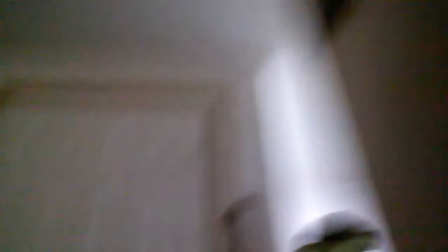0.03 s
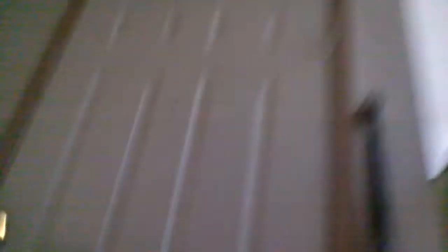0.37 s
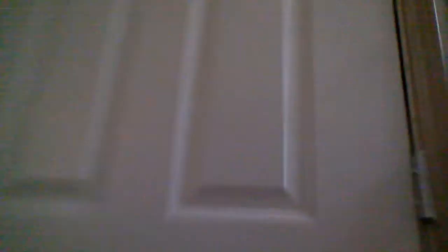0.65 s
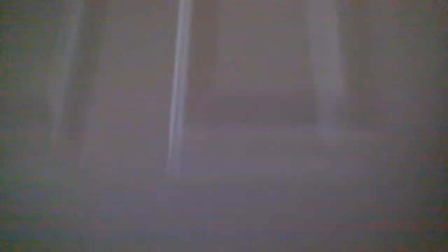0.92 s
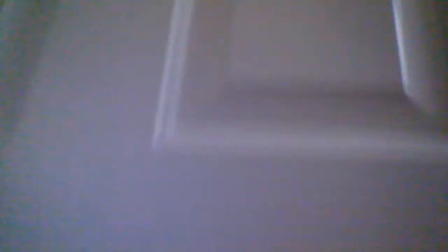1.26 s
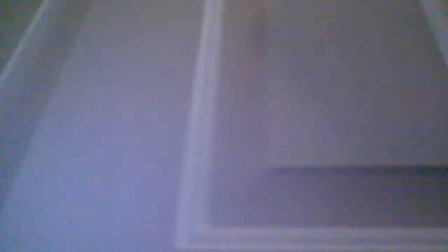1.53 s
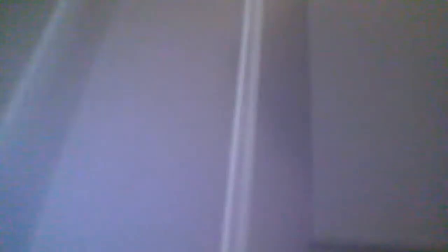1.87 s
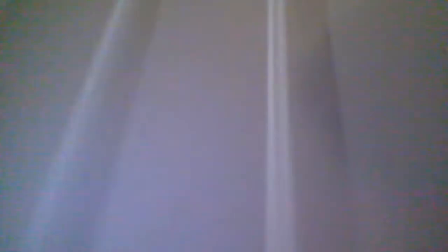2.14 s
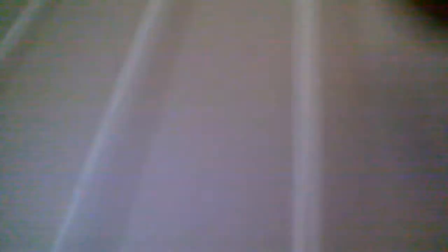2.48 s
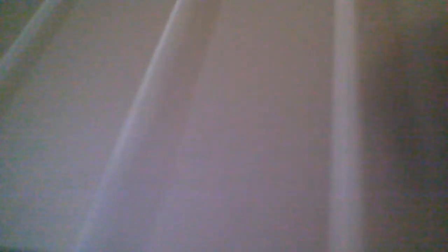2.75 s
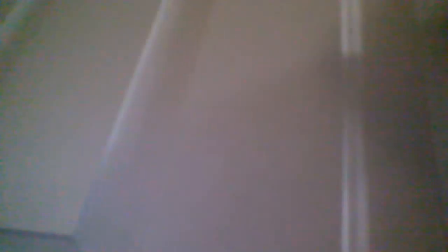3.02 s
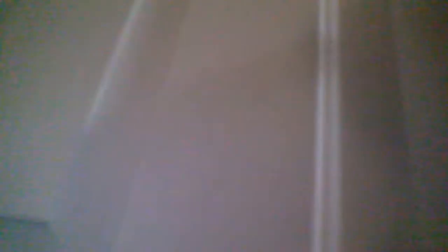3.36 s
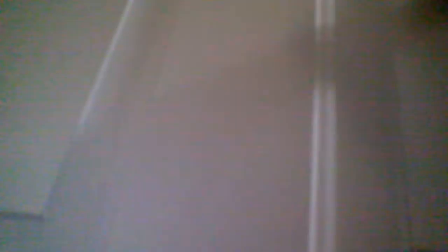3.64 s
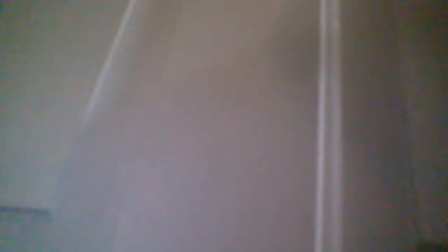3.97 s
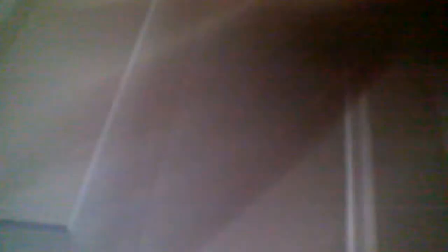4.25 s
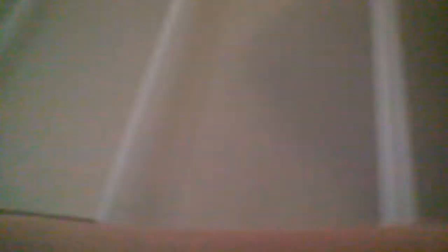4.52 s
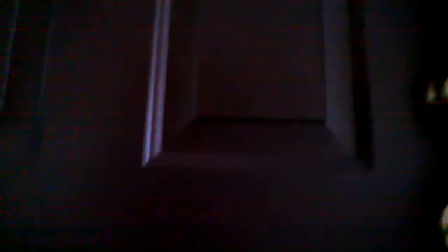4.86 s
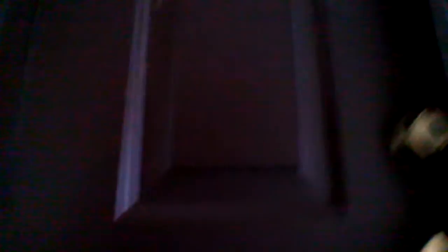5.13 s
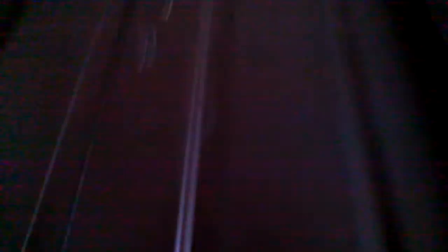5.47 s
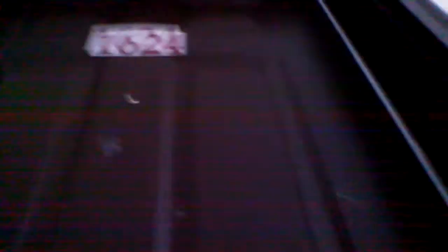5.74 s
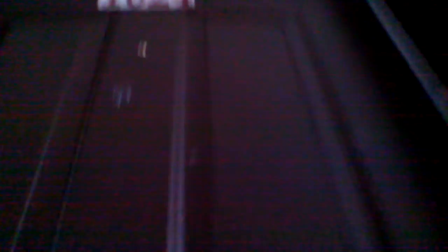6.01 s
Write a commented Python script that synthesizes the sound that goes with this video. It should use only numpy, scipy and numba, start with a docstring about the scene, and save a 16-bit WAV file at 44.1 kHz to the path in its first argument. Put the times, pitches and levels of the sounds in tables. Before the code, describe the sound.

A hand rustles and ticks against a small camera, knuckles rap quietly on a door, and the grip shifts with loud bumps.

```python
"""At a panelled door in a very quiet house, heard from the microphone of a small hand-held camera.
As it is carried up to the door, hand and cloth rub over its plastic case, which ticks and thuds.
Knuckles rap six times, ringing the panel and the hallway. Then the hand shifts its grip right at
the microphone, with scuffs and bumps that overload it. Faint room tone and hiss lie underneath."""
import sys
import numpy as np
from scipy import signal
from scipy.fft import rfft, irfft, next_fast_len
from scipy.io import wavfile
from scipy.ndimage import uniform_filter1d, minimum_filter1d
from numba import njit

SR = 44100
rng = np.random.default_rng(int(sys.argv[2]) if len(sys.argv) > 2 else 0)


def waveform_to_disk(signal):
    """Save audio, clipped to [-1, 1], as 16-bit WAV at the path in sys.argv[1]."""
    frames = np.transpose(np.atleast_2d(signal))
    scaled = np.clip(frames, -1, 1) * 32767
    samples = np.round(scaled).astype(np.int16)
    wavfile.write(sys.argv[1], SR, samples)


N = 268745
TIME = np.arange(N) / SR

# hand and cloth on the case, right by the microphone: t/s, length/s, hiss/dB, rasp/dB, rumble/dB
CASE_STROKES = [(0.092, 0.021, -41, -52, -55), (0.245, 0.057, -33.5, -41.5, -37.5),
                (0.468, 0.038, -36.5, -45, -52), (0.54, 0.14, -31.5, -36, -50),
                (0.7, 0.045, -25.5, -35.5, -40), (0.755, 0.039, -39, -51, -52.5),
                (0.888, 0.071, -43, -52.5, -63), (0.985, 0.11, -41.5, -42.5, -48),
                (1.048, 0.038, -25, -28.5, -26.5), (1.09, 0.081, -23.5, -39.5, -31),
                (1.17, 0.11, -30.5, -44.5, -42.5), (1.475, 0.017, -44.5, -46.5, -54),
                (1.57, 0.25, -42.5, -45.5, -69), (1.62, 0.356, -33.5, -40.5, -44.5),
                (1.97, 0.041, -45, -52.5, -70), (2.125, 0.16, -34, -33.5, -38.5),
                (2.255, 0.064, -40, -45, -37), (2.525, 0.15, -49, -55.5, -43),
                (2.61, 0.044, -39.5, -45.5, -33), (2.715, 0.018, -58.5, -63.5, -48)]
# brief breaths of hiss around the raps and clicks at the door: t/s, length/s, level/dB
HISS_BREATHS = [(3.003, 0.06, -62.5), (3.745, 0.022, -45), (4.078, 0.046, -50), (4.19, 0.04, -54.5),
                (4.47, 0.046, -55)]
# spectra of the rubbing's hiss, rasp and rumble: f/Hz, level/dB
HISS_SPECTRUM = [(1470, -47.5), (2500, -33), (3550, -24.5), (3830, -21.5), (4140, -9), (5690, 0),
                 (7350, 1.5), (8000, -7), (9890, -16), (15200, -24.5), (16000, -30)]
RASP_SPECTRUM = [(150, -12.5), (320, 5), (480, -16), (880, 2), (1600, -4.5), (2300, -1), (3500, 0),
                 (4400, 4.5), (7000, -13), (12000, -43.5)]
RUMBLE_SPECTRUM = [(25, -8.5), (60, 1.5), (130, 4), (220, -2), (340, -12.5), (600, -17), (1500, -37.5)]
def rubbing():
    """Cloth hisses in the microphone port; harder pressure adds rasp and shakes the case."""
    hiss_gain, rasp_gain, rumble_gain = slide_gains(CASE_STROKES)
    rap_breaths = [(start, 0.062, db) for start, _, db in DOOR_RAPS]  # hiss comes up with each rap
    breath_gain, = slide_gains(list(HISS_BREATHS) + rap_breaths)
    hiss = friction(HISS_SPECTRUM, slips_per_s=22000, spread_db=0, catch_db=1.6, catch_hz=90)
    rasp = friction(RASP_SPECTRUM, slips_per_s=8000, spread_db=1, catch_db=1.8, catch_hz=200)
    rumble = friction(RUMBLE_SPECTRUM, slips_per_s=1500, spread_db=1, catch_db=2, catch_hz=50)
    return (hiss * (hiss_gain + breath_gain) + rasp * (rasp_gain + breath_gain * undb(-2))
            + rumble * rumble_gain)


# fingers bump the case that holds the microphone: t/s, level/dB, thud f/Hz, relative contact/dB
FINGER_BUMPS = [(0.282, -21.5, 228, 4), (0.607, -28.5, 165, -9), (0.653, -29, 67, -31),
                (0.884, -34.5, 53.4, -42), (1.008, -27, 69.5, -10), (1.012, -15, 276, -8),
                (1.067, -13, 195, -4), (1.13, -18.5, 243, -22), (1.171, -22.5, 99, -5.5),
                (2.113, -29, 78, -18), (4.923, -17, 91, -16.5), (4.964, -5.5, 74, -9),
                (4.9715, -4, 150, -14), (4.9801, 7.5, 441, -16), (4.9864, -0.5, 106, -10),
                (4.993, -12.5, 187, 4.5), (5.0146, -16, 303, 5), (5.022, -4.5, 256, -4.5),
                (5.669, -4, 101, -8), (5.687, -7, 84, -11), (5.709, -15.5, 134, 7.5),
                (5.799, 1, 223, -17.5), (6.0134, -10.5, 300, 3.5), (6.03, -9, 82.4, -11)]
# spectrum of a firm contact: f/Hz, level/dB
CONTACT_SPECTRUM = [(120, -19), (280, 7), (480, 1.5), (800, -4), (1300, -15.5), (2200, -21), (4000, -40.5),
                    (9000, -58)]
def bumps():
    """Each blow rocks the case for a cycle or two; a firm contact adds a brief knock."""
    out, t = np.zeros(N), TIME[:4096]
    for start, db, hz, contact_db in FINGER_BUMPS:
        rocking = np.sin(2 * np.pi * hz * t) * np.exp(-1.3 * hz * t)
        thud = lowpass(rocking, np.full(len(t), hz * 4), damping=1.4)
        noise_tail = undb(-28.5) * rng.standard_normal(len(t)) * np.exp(-t / 0.013)
        contact = colour((t == 0) + noise_tail, CONTACT_SPECTRUM)
        bump = undb(2) * unit_peak(thud) + undb(contact_db + 5.5) * unit_peak(contact)
        add(out, start, bump * undb(db))
    return out


# the palm shifts directly over the microphone: t/s, length/s, hiss/dB, rustle/dB, rumble/dB
PALM_SHIFTS = [(4.858, 0.28, -100, -49.5, -46), (5.04, 0.038, -38.5, -35.5, -35.5),
               (5.085, 0.097, -47.5, -46.5, -45), (5.262, 0.034, -50.5, -48, -43.5),
               (5.32, 0.51, -58, -54, -52), (5.495, 0.034, -38.5, -43.5, -42),
               (5.595, 0.081, -40, -46.5, -45), (5.7, 0.04, -34, -30, -27), (5.81, 0.048, -48, -33.5, -34),
               (5.86, 0.5, -58, -39, -31), (6.022, 0.053, -77, -28.5, -16)]
# spectra of the palm's hiss, rustle and rumble: f/Hz, level/dB
PALM_HISS_SPECTRUM = [(1200, -6), (2200, -2), (2800, -2), (3500, -3.5), (5200, 0.5), (6200, -11.5),
                      (7500, -2), (9500, -12), (15500, -12)]
PALM_RUSTLE_SPECTRUM = [(450, 9), (880, 12.5), (1250, 3), (1550, 2.5), (2500, -9), (4500, -30),
                        (7800, -39.5), (9200, -13), (11000, -17), (15000, -39)]
PALM_RUMBLE_SPECTRUM = [(25, -9), (80, 9.5), (150, 10.5), (350, -2), (550, -1), (1200, -45)]
def palm():
    """The palm half covers the port, so its creeping sounds duller."""
    hiss_gain, rustle_gain, rumble_gain = slide_gains(PALM_SHIFTS, attack_db_per_s=664,
                                                      release_db_per_s=198)
    hiss = friction(PALM_HISS_SPECTRUM, slips_per_s=16000, spread_db=0, catch_db=1, catch_hz=20)
    rustle = friction(PALM_RUSTLE_SPECTRUM, slips_per_s=6000, spread_db=1, catch_db=1, catch_hz=80)
    rumble = friction(PALM_RUMBLE_SPECTRUM, slips_per_s=3000, spread_db=1, catch_db=1, catch_hz=60)
    return hiss * hiss_gain + rustle * rustle_gain + rumble * rumble_gain


# skin scuffs across the microphone port itself:
# t/s, length/s, level/dB, upper edge at start f/Hz, at end f/Hz, edge damping, relative thud/dB
PORT_SCUFFS = [(0.228, 0.087, -29.5, 5540, 5830, 0.43, -36), (1.03, 0.068, -31.5, 1330, 1220, 0.44, -6),
               (3.787, 0.018, -39.5, 3200, 4300, 0.37, -7.5), (4.953, 0.073, -25.5, 725, 1510, 4.6, 13),
               (4.991, 0.057, -20, 4300, 7350, 2.2, -4), (5.008, 0.037, -28.5, 13500, 15500, 3.2, -15),
               (5.602, 0.064, -38.5, 17500, 17500, 1.3, -14), (5.636, 0.017, -23, 15400, 13500, 1.2, -18),
               (5.642, 0.025, -28, 7700, 5760, 0.52, 5.5), (5.693, 0.0068, -23.5, 4960, 7200, 3.4, -7),
               (5.703, 0.028, -22.5, 6950, 6700, 4.3, 9), (5.787, 0.042, -23.5, 5830, 3700, 7.5, 10.5),
               (6.016, 0.24, -38.5, 1650, 1540, 0.52, 12)]
def scuffs():
    """Quick slides open or close the port, sweeping the noise's resonant edge, and drag at the case."""
    out = np.zeros(N)
    drag = friction(PALM_RUMBLE_SPECTRUM, slips_per_s=6000, spread_db=.5, catch_db=.5, catch_hz=100)
    for start, length, db, start_hz, end_hz, damping, thud_db in PORT_SCUFFS:
        n = int(length * SR)
        edge_hz = np.geomspace(start_hz, end_hz, n)
        hiss = lowpass(rng.standard_normal(N)[:n], edge_hz, damping)
        hiss = lowpass(hiss, edge_hz, damping=0.23)
        hiss = hiss - lowpass(hiss, edge_hz * 0.04, damping=3.6)  # thins the bass
        thud = undb(thud_db) * unit_rms(np.roll(drag, -int(start * SR))[:n])
        envelope = np.sin(np.pi * np.arange(n) / n) ** 0.55  # starts and stops rather abruptly
        add(out, start, (unit_rms(hiss) + thud) * envelope * undb(db))
    return out


# the plastic case ticks around the microphone: t/s, level/dB, relative body below 2.5 kHz/dB
CASE_TICKS = [(0.094, -37, -20), (0.1242, -29.5, -7), (0.1495, -30.5, -15), (0.5399, -18.5, -3.5),
              (0.547, -18, -6), (0.7916, -29, -9), (0.999, -11, 6), (1.0337, -6.5, 13), (1.0382, -7.5, -17),
              (1.045, 0.5, 6), (1.275, -30.5, 14), (1.6527, -11.5, -5), (1.686, -14.5, -5),
              (1.7068, -16, 0), (2.0965, -36, -3), (2.2169, -5.5, -4.5), (2.613, -15, -4.5),
              (3.003, -36.5, -22.5), (3.7906, -27.5, 2), (4.142, -19.5, 8), (4.152, -25.5, -12),
              (4.47, -26.5, -7.5), (4.9662, -24, 12), (5.113, -22.5, -7), (5.71, -32, 4),
              (5.7772, -15.5, 11)]
# spectrum of a tick: f/Hz, level/dB
TICK_SPECTRUM = [(200, -3), (1100, 2.5), (2500, -6.5), (4100, -1), (5500, 6), (7300, 4), (9000, -13.5),
                 (16000, -19)]
def ticks(ring_hz=4050, ring_db=-17.5, ring_t60_s=0.03):
    """Sharp cracks of the plastic shell; each slides down into a short ring."""
    out, t = np.zeros(N), TIME[:4096]
    ring = undb(ring_db - 60 * t / ring_t60_s) * np.sin(2 * np.pi * ring_hz * t)
    _, poles = signal.iirpeak(ring_hz, Q=1.5, fs=SR)
    dispersion = np.tile(np.r_[poles[::-1], poles], (4, 1))  # all-passes delay the band near the ring
    decay = undb(-17) * np.exp(-t / 0.0005) + undb(-36) * np.exp(-t / 0.0031)
    for start, db, body_db in CASE_TICKS:
        crack = colour((t == 0) + rng.standard_normal(len(t)) * decay, TICK_SPECTRUM)
        crack = colour(crack, [(20, body_db + 5), (1800, body_db - 1.5), (3500, 0)])
        crack = signal.sosfilt(dispersion, crack)
        add(out, start, (unit_peak(crack) + ring) * undb(db))
    return out


# cloth drawn along the case, close to the microphone: t/s, length/s, level/dB
CLOTH_SWIPES = [(0.617, 0.082, -33), (1.651, 0.34, -24.5), (2.102, 0.12, -27), (2.452, 0.27, -49.5)]
# its broad spectrum: f/Hz, level/dB
SWIPE_SPECTRUM = [(1200, -36.5), (1600, -8.5), (2000, -10), (2450, -3), (3450, 0.5), (4200, 0.5),
                  (4900, -2), (5500, 3), (6200, -4), (7400, 1), (8500, -24)]
def swipes():
    """Cloth drawn along the case makes a soft, even swish that swells and fades with its speed."""
    gain = np.zeros(N)
    for start, length, db in CLOTH_SWIPES:
        add(gain, start, np.hanning(int(length * SR)) * undb(db))
    return gain * friction(SWIPE_SPECTRUM, slips_per_s=20000, spread_db=0, catch_db=1.1, catch_hz=130)


# fingertips tap the case, close to the microphone: t/s, peak level/dB
FINGER_TAPS = [(0.232, -32), (1.902, -28.5), (1.921, -26), (2.097, -34.5), (2.132, -25.5), (2.194, -27.5),
               (2.245, -15.5), (2.268, -16.5), (2.281, -20.5), (2.296, -23.5), (2.309, -28), (2.396, -46.5)]
# modes of the hollow case: f/Hz, level/dB, t60/s
CASE_MODES = [(165, -6.5, 0.0733), (325, -6, 0.028), (663, 0.5, 0.04), (847, -8, 0.033),
              (1410, -12.5, 0.0078), (2010, -13, 0.008)]
def taps(grip_detune=0.096):
    """Each fingertip rings the hollow case for a moment and shifts its modes a little differently."""
    out, t = np.zeros(N), TIME[:4096]
    for start, db in FINGER_TAPS:
        shifts = 1 + grip_detune * rng.uniform(-0.79, 1, len(CASE_MODES))
        ring = sum(undb(mode_db - 60 * t / t60) * np.sin(2 * np.pi * hz * shift * t)
                   for (hz, mode_db, t60), shift in zip(CASE_MODES, shifts))
        add(out, start, unit_peak(ring) * undb(db))
    return out


# the tight grip creaks right at the microphone: t/s, peak level/dB
GRIP_CREAKS = [(4.9214, -41.5), (4.936, -46), (4.965, -27.5), (5.44, -46), (5.778, -22), (5.957, -40)]
# spectrum of a creak: f/Hz, level/dB
CREAK_SPECTRUM = [(4000, -36), (7500, -13), (9700, 7), (11500, -5), (15500, -17)]
def creaks(decay_s=0.00082):
    """Single tiny slips of skin on plastic make light, high ticks."""
    out, t = np.zeros(N), TIME[:1024]
    for start, db in GRIP_CREAKS:
        slip = colour(rng.standard_normal(len(t)) * np.exp(-t / decay_s), CREAK_SPECTRUM)
        add(out, start, unit_peak(slip) * undb(db))
    return out


# knuckles on the door, within arm's reach: t/s, rap level/dB, hiss level/dB
DOOR_RAPS = [(3.073, -49, -60.5), (3.288, -44, -65), (3.509, -35.5, -59), (3.679, -36.5, -58),
             (3.881, -44.5, -66), (4.095, -33, -40)]
# modes of the door panel: f/Hz, level/dB, t60/s
PANEL_MODES = [(119, -5.5, 1), (377, 3, 1), (526.4, -8.5, 0.98), (672, -9, 0.34), (818, -11.5, 0.8),
               (886, -8, 0.5), (1011, -15.5, 0.31), (1122, -12.5, 0.21), (1170, -19.5, 0.26),
               (1600, -28, 0.3)]
# spectrum of the hallway's reflections: f/Hz, level/dB
HALLWAY_SPECTRUM = [(40, 6.5), (110, 4), (210, -2), (380, 4), (460, -3), (800, 0), (1200, -16.5),
                    (1800, -29), (2800, -70)]
def knocks(firm_rap_db=-34, firm_hold_s=0.079):
    """Each rap rings the panel and the hallway, then is cut off abruptly."""
    out, t = np.zeros(N), TIME[:12000]
    panel = sum(undb(mode_db - 60 * t / t60) * np.sin(2 * np.pi * (hz * t + rng.random()))
                for hz, mode_db, t60 in PANEL_MODES)
    attack = np.tanh(t / 0.0008)
    for start, db, _ in DOOR_RAPS:
        force_db = db - firm_rap_db  # softer raps are duller and shorter
        treble_db = 10 + 1.34 * force_db
        hold_s = firm_hold_s * undb(0.07 * force_db)
        hallway = colour(rng.standard_normal(len(t)) * undb(-60 * t / 1.5), HALLWAY_SPECTRUM)
        envelope = attack * (np.exp(-(t / hold_s) ** 4) + undb(-62))
        rap = (unit_rms(panel) + undb(2) * unit_rms(hallway)) * envelope
        brightness = [(20, 2), (800, -2.5), (1500, treble_db), (3000, treble_db + 4), (9000, -25.5)]
        add(out, start, unit_rms(colour(rap, brightness)) * undb(db))
    return out


# low thumps on the way to the door, probably steps on the floor: t/s, level/dB, f/Hz
LOW_THUMPS = [(0.512, -22.5, 106.4), (2.222, -23.5, 152.2), (2.613, -24, 140.4)]
def thumps(t60_s=0.22):
    """Each soft thump builds over a cycle, then booms and dies away with an uneven rumble."""
    out, t = np.zeros(N), TIME[:12000]
    rumble = undb(-6) * unit_rms(colour(rng.standard_normal(N), RUMBLE_SPECTRUM))
    for start, db, hz in LOW_THUMPS:
        boom = np.sin(2 * np.pi * hz * t) + np.roll(rumble, -int(start * SR))[:len(t)]
        add(out, start, boom * np.tanh(hz * t) * undb(db - 60 * t / t60_s))
    return out


# a faint wash behind the close handling noise: t/s, length/s, level/dB
WASH_SPANS = [(0.0, 0.048, -60.5), (0.09, 0.13, -50.5), (0.33, 0.49, -51.5), (1.31, 0.39, -62.5),
              (5.06, 0.13, -45), (5.47, 0.11, -52), (5.735, 0.041, -42)]
# its hollow spectrum: f/Hz, level/dB
WASH_SPECTRUM = [(400, -18.5), (680, 10), (830, 4.5), (1050, 7), (1700, -9.5), (2500, 1.5), (2900, 6.5),
                 (3550, -13.5), (4600, 4.5), (5200, 9.5), (6000, -0.5), (6800, 8), (8500, -7.5),
                 (12000, -19.5)]
def hollow_wash():
    """A faint, hollow wash of noise trails the rubbing and bumps."""
    gain, = slide_gains(WASH_SPANS)
    return gain * friction(WASH_SPECTRUM, slips_per_s=30000, spread_db=0, catch_db=.7, catch_hz=50)


# brief tones in the background: t/s, length/s, f/Hz, level/dB
FAINT_TONES = [(2.755, 0.038, 327, -51), (3.099, 0.12, 318, -44), (4.45, 0.27, 995, -70)]
def tones():
    """Faint pure tones swell and fade."""
    out = np.zeros(N)
    for start, length, hz, db in FAINT_TONES:
        t = TIME[:int(length * SR)]
        swell = np.sqrt(2) * undb(db) * np.sin(np.pi * t / length)
        add(out, start, swell * np.sin(2 * np.pi * hz * t))
    return out


# room tone of the house and the microphone's own hiss: f/Hz, level/dB
ROOM_SPECTRUM = [(40, 0), (140, 9), (450, -11), (770, -9), (830, -2), (880, -6), (1200, -14), (1600, -18.5),
                 (3500, -21), (5200, -18), (7400, -16.5), (8600, -21.5)]
def room_tone(foreground, open_level_db=-61, threshold_db=-54.5, deepest_cut_db=-14, hold_s=0.0092):
    """A noise suppressor turns room tone and hiss down, except during and just after louder sounds."""
    level_db = 10 * np.log10(uniform_filter1d(foreground ** 2, size=128).clip(1e-12))
    hold = int(hold_s * SR)
    held_db = -minimum_filter1d(-level_db, hold, origin=(hold - 1) // 2)  # the recent maximum
    cut_db = np.clip(0.7 * (held_db - threshold_db), deepest_cut_db, 0)
    gain = undb(open_level_db + uniform_filter1d(cut_db, size=128))
    return gain * unit_rms(colour(rng.standard_normal(N), ROOM_SPECTRUM))


def friction(spectrum, slips_per_s, spread_db, catch_db, catch_hz):
    """Tiny slips of uneven size, bunched as the surface catches and lets go."""
    slips = (rng.random(N) < slips_per_s / SR) * rng.standard_normal(N)
    slips *= undb(spread_db * rng.exponential(size=N))
    catching = undb(catch_db * wander(catch_hz))
    return unit_rms(colour(slips * catching, spectrum))


def slide_gains(rows, attack_db_per_s=647, release_db_per_s=478.5, grab_db=7, grab_s=0.0009):
    """One gain curve for each dB column: a slide catches, swells to its middle, lets go and fades."""
    power = 0
    for start, length, *levels in rows:
        before, after = np.maximum(start - TIME, 0), np.maximum(TIME - start - length, 0)
        from_middle = np.clip(2 * (TIME - start) / length - 1, -1, 1)
        swell_db = -23.5 * length * from_middle ** 2  # a longer slide gathers more speed
        step_db = grab_db * np.tanh((before + after) / grab_s)
        fade_db = np.minimum(attack_db_per_s * before + release_db_per_s * after, 200)
        power = power + np.outer(undb(levels), undb(swell_db - step_db - fade_db)) ** 2
    return np.sqrt(power)


def wander(rate_hz):
    """Smooth random drift with rms 1."""
    step = max(int(SR / rate_hz), 1)
    stairs = np.repeat(rng.standard_normal(N)[:N // step + 1], step)
    return unit_rms(uniform_filter1d(stairs, step)[:N])


def colour(x, spectrum):
    """Causal filter through (f/Hz, level/dB) points, falling 12 dB an octave below the first."""
    hz, db = np.transpose(spectrum)
    size = 2 * next_fast_len(len(x))
    f = np.maximum(np.arange(size // 2 + 1) * SR / size, 1)
    response_db = np.interp(np.log(f), np.log(hz), db) + 12 * np.minimum(np.log2(f / hz[0]), 0)
    cepstrum = irfft(np.log(undb(response_db)))
    cepstrum[1:size // 2] *= 2  # folded for minimum phase
    cepstrum[size // 2 + 1:] = 0
    return irfft(rfft(x, size) * np.exp(rfft(cepstrum)))[:len(x)]


@njit
def lowpass(x, hz, damping):
    """Resonant two-pole low-pass whose edge may move."""
    y, band_state, low_state = np.empty(len(x)), 0., 0.
    for i in range(len(x)):
        g = np.tan(np.pi * min(hz[i] / SR, .45))
        band = (band_state + g * (x[i] - low_state)) / (1 + g * (g + damping))
        y[i] = low_state + g * band
        band_state, low_state = 2 * band - band_state, 2 * y[i] - low_state
    return y


def undb(db):
    """Decibels to gain."""
    return 10 ** (np.asarray(db) / 20)


def unit_rms(x):
    """Scale to rms 1."""
    return x / np.sqrt(np.mean(x ** 2))


def unit_peak(x):
    """Scale to peak 1."""
    return x / abs(x).max()


def add(out, start_s, x):
    """Mix x into out from start_s."""
    i = max(int(start_s * SR), 0)
    out[i:i + len(x)] += x[:max(N - i, 0)]


def scene():
    """Close handling noise and knocks on the door over the quiet of the house, in mono."""
    sliding = rubbing() + hollow_wash() + swipes() + palm() + scuffs()
    impacts = ticks() + creaks() + taps() + bumps() + thumps() + knocks()
    foreground = sliding + impacts + tones()
    return (foreground + room_tone(foreground))[None]


def record(dry):
    """The microphone drops the deepest bass, clips on the hardest bumps and cuts the top."""
    bass_cut = signal.butter(2, 32, "high", fs=SR, output="sos")
    top_cut = signal.ellip(10, .2, 80, 16100, fs=SR, output="sos")
    clipped = np.clip(signal.sosfilt(bass_cut, dry), -.97, .97)
    return signal.sosfilt(top_cut, clipped)


dry = scene()
out = record(dry)
waveform_to_disk(out)
```